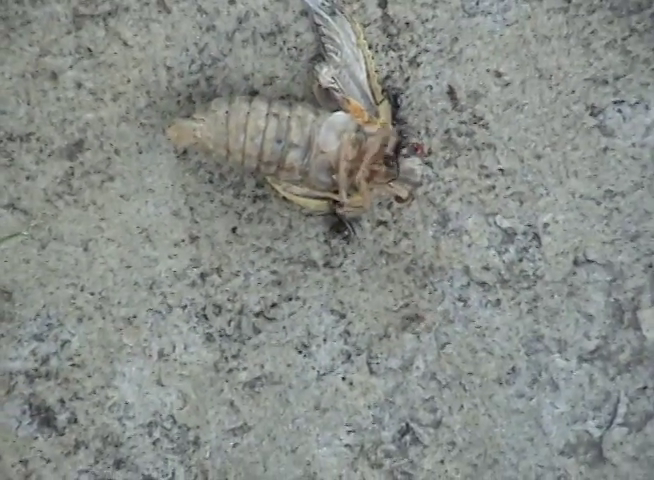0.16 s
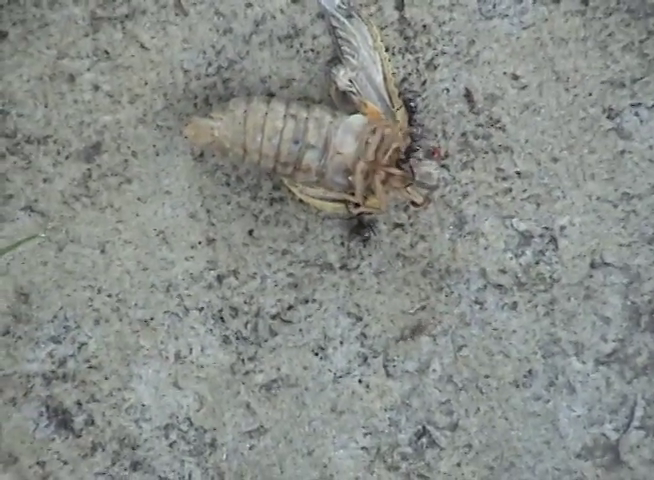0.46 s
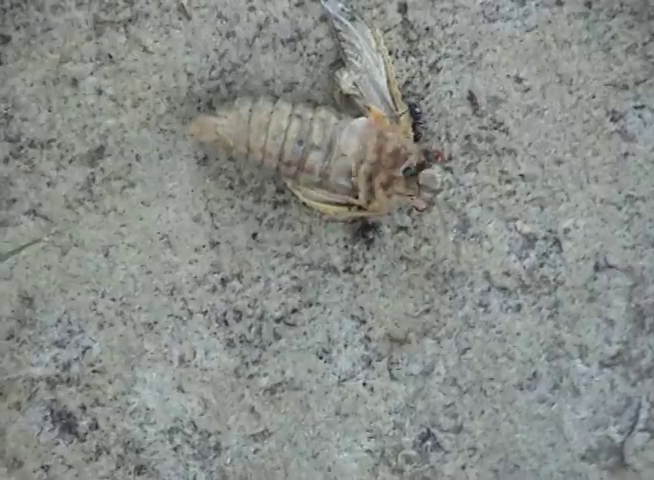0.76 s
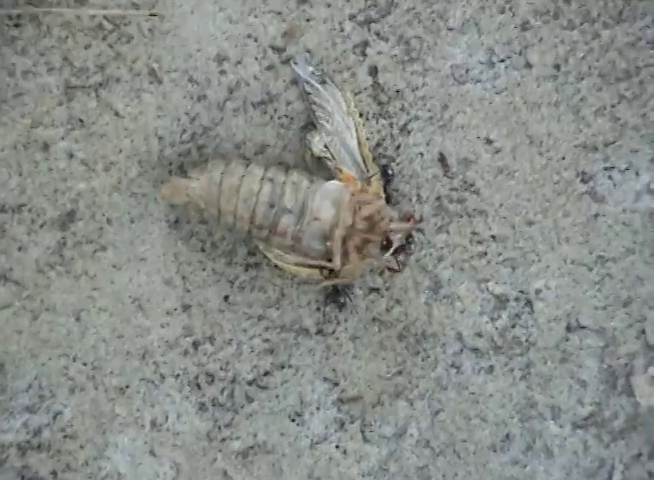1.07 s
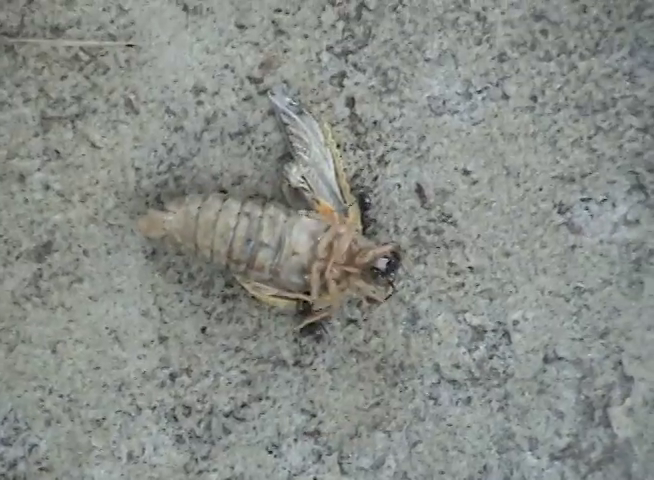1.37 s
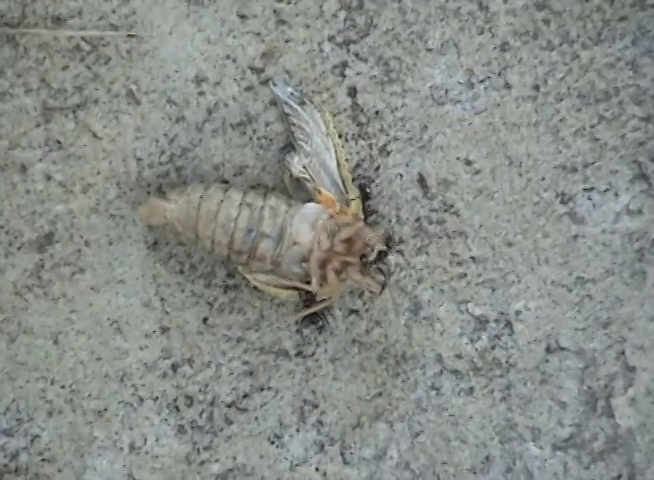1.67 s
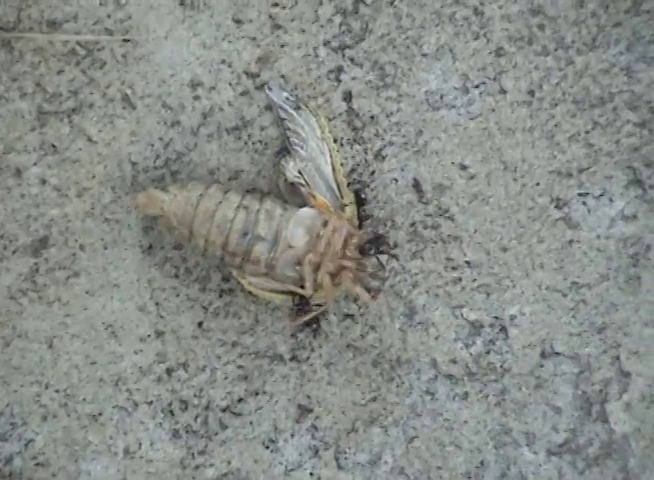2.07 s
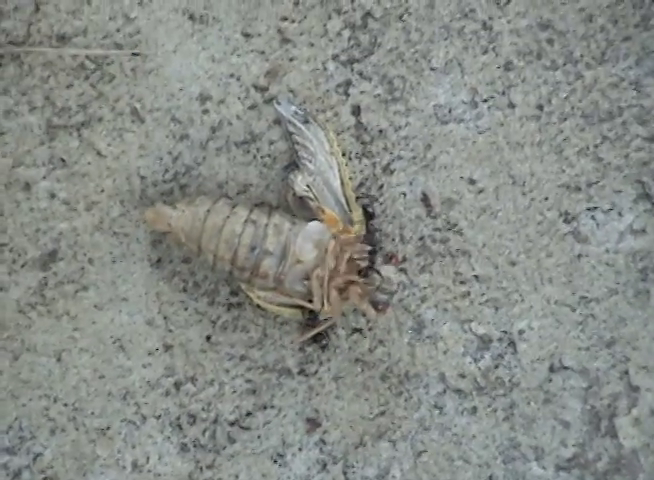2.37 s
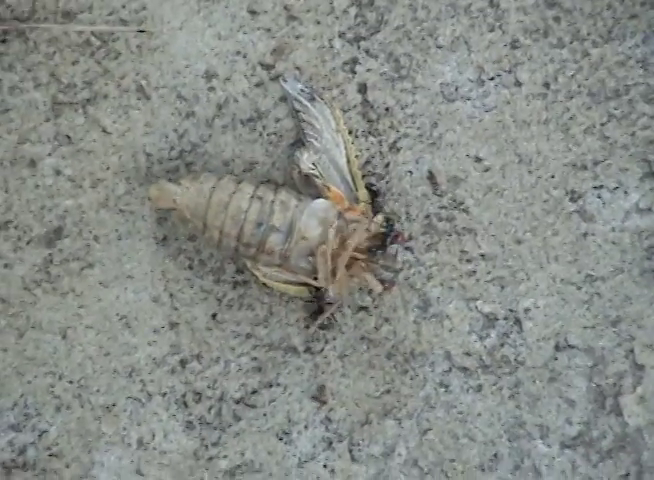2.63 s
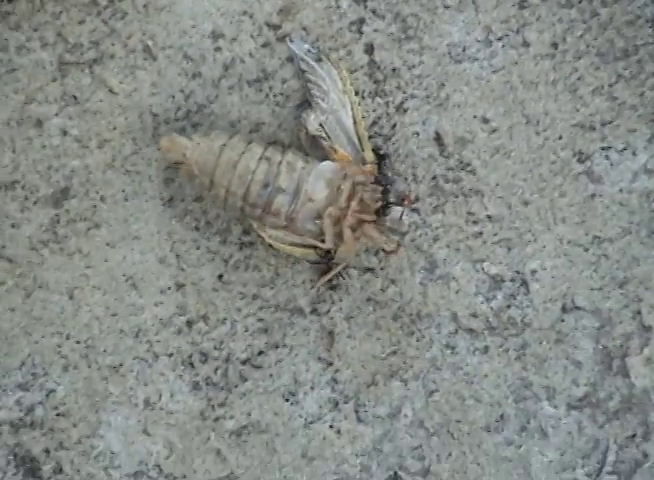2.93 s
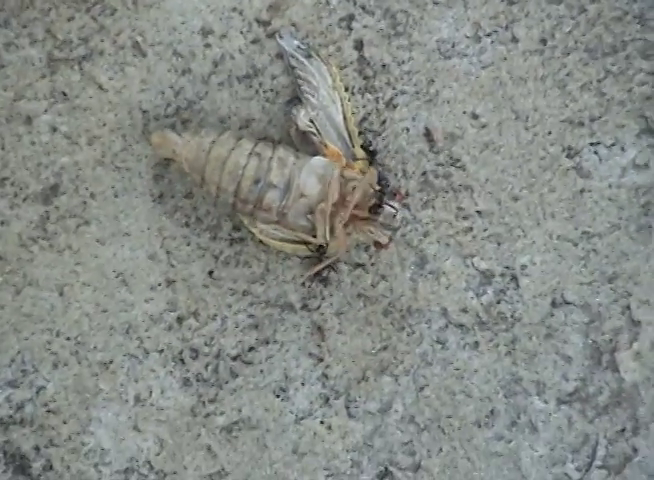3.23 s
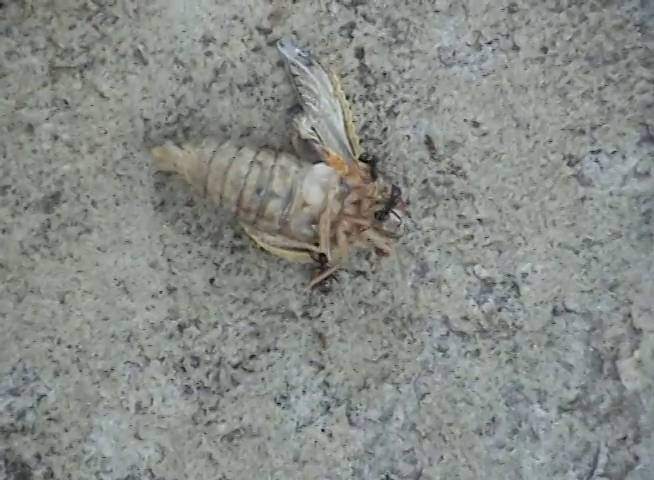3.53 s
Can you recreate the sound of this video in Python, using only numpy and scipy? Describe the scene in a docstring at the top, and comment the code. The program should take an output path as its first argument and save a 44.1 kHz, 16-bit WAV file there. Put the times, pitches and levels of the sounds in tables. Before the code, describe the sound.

Many cicadas whir steadily in the open air while the microphone picks up light handling taps.

```python
"""Cicada chorus in the trees

A dense chorus on a hand-held microphone, close above a stone slab. Many far cicadas click their
tymbals and merge into one whirring drone near 1.3 kHz; others hiss, the nearest in swells about three
times a second. Small handling knocks, ticks and scuffs sit over a faint machine hum and outdoor rumble."""
import sys
import numpy as np
from scipy import signal
from scipy.fft import rfft, irfft
from scipy.io import wavfile

SR = 44100
rng = np.random.default_rng(int(sys.argv[2]) if len(sys.argv) > 2 else 0)


def materialize(psi):
    """Save the field psi as 16-bit PCM at rate SR to the path in sys.argv[1].

    A 1-D psi becomes a single channel; in a 2-D psi each row is a channel.
    """
    bounded = np.clip(np.atleast_2d(psi).T, -1, 1)
    quanta = np.round(bounded * 32767).astype(np.int16)
    wavfile.write(sys.argv[1], SR, quanta)


N = 163170
T = np.arange(N) / SR


def droning_cicada(pitch_hz, wander_hz=10.2, ring_width_hz=72, clicks_per_s=170, swell_db=2):
    """One cicada: a train of tymbal clicks rings its hollow abdomen, whose pitch wanders."""
    click_rate = clicks_per_s * rng.uniform(.7, 1.3) * (1 + .35 * drift(120))
    clicks = np.diff(np.floor(np.cumsum(click_rate) / SR), prepend=0)
    carrier = np.exp(2j * np.pi * np.cumsum(pitch_hz + wander_hz * drift(4)) / SR)
    pole = np.exp(-np.pi * ring_width_hz / SR)
    # Shift down, low-pass, shift back: a resonance that follows the pitch.
    ring = carrier * signal.lfilter([(1 - pole) ** 2], [1, -2 * pole, pole ** 2], clicks * carrier.conj())
    return unit(ring.real) * amp(swell_db * drift(3.25))


def cicada_drone(count=20, pitch_hz=1328.7, spread_hz=19, width=0.4, trees_t60=0.15):
    """The nearer droning cicadas, scattered by the trees, over the blur of the farthest ones."""
    # Spectrum of the farthest cicadas. Each row: frequency in Hz, relative level in dB.
    far_spectrum = [(440, -58), (740, -30.5), (835, -18), (1020, -19), (1140, -8.5), (1320, 0),
                    (1360, -3.5), (1470, -12), (1720, -25.5), (2000, -37), (2600, -73), (4400, -120)]
    # Rise and fall of the whole drone. Each row: time in seconds, gain in dB.
    contour = [(0, -30), (.18, -31), (.34, -27), (.52, -31.5), (.8, -30), (1.1, -29), (1.5, -29.5),
               (2.2, -31), (2.5, -31), (3.18, -31.5), (3.26, -29), (3.35, -31.5), (3.7, -31.3)]
    voices = np.array([droning_cicada(pitch_hz + spread_hz * step) for step in np.linspace(-1, 1, count)])
    mid = unit(scatter(voices[::2].sum(0), trees_t60)[0])
    side = width * unit(scatter(voices[1::2].sum(0), trees_t60)[1])
    near = amp(-2.5) * unit(np.array([mid + side, mid - side]))
    far = amp(0.5) * diffuse_noise(far_spectrum)
    return (near + far) * amp(np.interp(T, *np.transpose(contour)))


def cicada_hiss(bed_db=-45.5, buzz_db=-49, rise_s=0.019, fall_s=0.035):
    """A steady bed of hissing cicadas, and a nearer, brighter one that buzzes in swells."""
    # Spectra of the bed and the near cicada. Each row: frequency in Hz, relative level in dB.
    bed_spectrum = [(1500, -10), (2000, -1), (2650, -3.5), (3150, -8), (3900, -1.5), (4880, -3.5),
                    (5620, 0), (6520, -3), (8140, -1), (8630, -4.5), (11400, -23.5), (14400, -31)]
    buzz_spectrum = [(4000, -18), (6300, -6.5), (7200, -1.5), (8200, 0.5), (8800, -4), (10500, -19),
                     (14000, -43)]
    # The near cicada's swells. Each row: start in seconds, length in seconds, relative level in dB.
    swells = [(0, 0.14, 0), (0.314, 0.19, -4), (0.567, 0.19, -1.5), (0.806, 0.13, -6), (0.952, 0.2, -3.5),
              (1.143, 0.26, -4), (1.408, 0.25, -4), (1.75, 0.11, -1), (1.872, 0.077, 1), (2.007, .25, -2),
              (2.34, 0.25, -3), (2.657, 0.25, -3), (3.022, 0.29, -2), (3.362, .26, -3)]
    effort = np.zeros(N)
    for start, length, db in swells:
        ramps = np.minimum((T - start) / rise_s, (start + length - T) / fall_s)
        effort += amp(db) * np.clip(ramps, 0, 1)
    buzz = amp(buzz_db + 1.5 * drift(24.88)) * effort * diffuse_noise(buzz_spectrum)
    bed = amp(bed_db + 0.62 * drift(18)) * diffuse_noise(bed_spectrum)
    return pan(buzz + bed, -0.6)


def handling_knocks(rise_s=0.0016, t60=0.013, echo_gain=0.26):
    """Dull knocks at the microphone: each rings one damped mode, with brief reflections."""
    # The knocks. Each row: start in seconds, peak in dB before panning, pitch in Hz, left over right in dB.
    knocks = [(.222, -33, 493, 12), (.5865, -26.5, 580, -7), (.5915, -29, 600, 17.5), (.66, -27, 610, -12),
              (.951, -31.5, 575, -13), (1.156, -28.5, 616, 0), (1.1765, -25.5, 655, 11),
              (1.221, -31, 760, 8), (1.301, -35.5, 590, -5), (1.403, -36, 610, -6),
              (2.0732, -22, 610, -8.5), (2.758, -29.5, 580, 7)]
    t, mix = T[:SR // 10], np.zeros((2, N))
    envelope = np.minimum(t / rise_s, 1) * amp(-60 * t / t60)
    for start, db, hz, pan_db in knocks:
        ring = envelope * np.sin(2 * np.pi * hz * t)
        add(mix, start, pan(at_peak(ring, db), pan_db))
    return mix + echo_gain * scatter(mix, t60=0.068)


def handling_ticks(snap_edge_hz=6600, crack_edge_hz=10000, crack_t60=0.0085):
    """Sharp ticks at the microphone: a short ringing snap with a fine crack of noise on top."""
    # The ticks. Each row: start in seconds, snap and crack peaks in dB before panning,
    # left over right in dB.
    ticks = [(.588, -38, -41, 7), (1.1565, -37, -34, 0), (1.1763, -28.5, -43, 14), (2.0169, -26, -38, 14),
             (2.073, -40, -31, -7), (2.756, -23, -40, -8), (3.2402, -32.5, -52, -9)]
    # What a tick rings. Each row: nominal frequency in Hz, relative level in dB, T60 in seconds.
    modes = [(1930, -2.5, 0.012), (2420, 0.5, 0.0085), (2840, 0, 0.011), (3270, -2.5, .010),
             (4080, 0.5, 0.0066), (4900, -2, 0.0062)]
    t, mix = T[:SR // 10], np.zeros((2, N))
    for start, snap_db, crack_db, pan_db in ticks:
        ring = np.zeros(len(t))
        for hz, db, t60 in modes:
            cycles = hz * rng.uniform(0.98, 1.06) * t + rng.random()
            ring += amp(db - 60 * t / t60) * np.sin(2 * np.pi * cycles)
        snap = signal.lfilter(*signal.butter(4, snap_edge_hz, fs=SR), ring)
        noise = signal.lfilter(*signal.butter(1, crack_edge_hz, fs=SR), rng.standard_normal(len(t)))
        crack = noise * amp(-60 * t / crack_t60)
        add(mix, start, pan(at_peak(snap, snap_db) + at_peak(crack, crack_db), pan_db))
    return mix


def handling_scuffs(slips_per_s=900, low_hz=130, high_hz=820):
    """Soft rubbing: sparse slips heard through a dull body."""
    # The scuffs. Each row: start in seconds, length in seconds, level at mid-scuff in dB.
    scuffs = [(0.399, 0.065, -44.5), (.47, 0.1, -42), (0.651, 0.028, -40)]
    mix = np.zeros((2, N))
    body = signal.butter(2, (low_hz, high_hz), "band", fs=SR, output="sos")
    for start, length, db in scuffs:
        slips = rng.standard_normal(N) * (rng.random(N) < slips_per_s / SR)
        rub = unit(signal.sosfilt(body, slips[:round(length * SR)]))
        add(mix, start, amp(db) * rub * np.sqrt(np.hanning(len(rub))))
    return mix


def machine_hum(pitch_hz=120.3, waver=0.00777, flicker_db=1.8):
    """A far machine hums, wavering in pitch and level."""
    # The hum's partials. Each row: harmonic number, mean level in dB.
    harmonics = [(1, -53.5), (2, -58), (3, -61)]
    phase = 2 * np.pi * np.cumsum(pitch_hz * (1 + waver * drift(8))) / SR
    hum = np.zeros(N)
    for number, db in harmonics:
        gain = amp(db + flicker_db * drift(5.51))
        hum += gain * unit(np.sin(number * phase + 2 * np.pi * rng.random()))
    return hum


def outdoor_rumble(level_db=-43):
    """Low, steady rumble of the open air."""
    # The rumble's spectrum. Each row: frequency in Hz, relative level in dB.
    spectrum = [(12, -42), (20, -11.5), (87, -1.5), (124, -1), (182, -3), (242, -4), (411, -9.5),
                (547, -8.5), (627, -11), (740, -17.5), (960, -29), (1630, -120)]
    return amp(level_db) * diffuse_noise(spectrum)


def diffuse_noise(spectrum):
    """Stereo noise of rms 1 with the given spectrum, falling 60 dB an octave outside it."""
    # Likeness of left and right at the microphone. Each row: frequency in Hz, coherence from 0 to 1.
    likeness = [(30, .8), (80, 1), (160, 0.89), (270, 0.87), (440, 0.28), (730, 0.53), (1200, 0.56),
                (2000, 0.42), (3260, 0.38), (5400, 0.72), (8900, 0.84), (14000, 0.9)]
    hz = np.fft.rfftfreq(N, 1 / SR)
    coherence = curve_at(likeness, hz)
    mid, side = rfft(rng.standard_normal((2, N))) * np.sqrt([1 + coherence, 1 - coherence])
    octaves_outside = np.abs(np.log2((hz + 1) / np.clip(hz + 1, spectrum[0][0], spectrum[-1][0])))
    gain = amp(curve_at(spectrum, hz) - 60 * octaves_outside)
    return unit(irfft(np.array([mid + side, mid - side]) * gain, N))


def scatter(x, t60):
    """A diffuse tail of reflections, different on each side, down 60 dB in t60 seconds."""
    tail = rng.standard_normal((2, N)) * amp(-60 * T / t60)
    return irfft(rfft(x) * rfft(tail / np.linalg.norm(tail[0])), N)


def drift(turns_per_s):
    """Random wandering of rms 1."""
    knots = rng.standard_normal(1024)
    return unit(np.interp(T * turns_per_s, np.arange(len(knots)), knots))


def curve_at(points, hz):
    """Interpolates a table on a log-frequency axis."""
    point_hz, value = np.transpose(points)
    return np.interp(np.log(hz + 1), np.log(point_hz + 1), value)


def amp(db):
    """Decibels to gain."""
    return 10 ** (np.asarray(db) / 20)


def unit(x):
    """Scales to rms 1."""
    return x / np.sqrt(np.mean(x ** 2) + 1e-20)


def at_peak(x, db):
    """Scales to a peak level."""
    return amp(db) * x / abs(x).max()


def pan(x, db):
    """Tips the balance to the left by db."""
    return x * amp([[db / 2], [-db / 2]])


def add(mix, start_s, sound):
    """Mixes a sound in at its start time."""
    part = mix[:, round(start_s * SR):][:, :sound.shape[-1]]
    part += sound[..., :part.shape[1]]


def scene():
    """Chorus, background and handling as they meet at the microphone."""
    outdoors = cicada_drone() + cicada_hiss() + machine_hum() + outdoor_rumble()
    return outdoors + handling_ticks() + handling_knocks() + handling_scuffs()


def record(dry):
    """The recorder's band limit, at 14.5 kHz."""
    lowpass = signal.firwin(511, 14500, window=("kaiser", 9), fs=SR)
    return signal.oaconvolve(dry, lowpass[None], "same")


dry = scene()
out = record(dry)
materialize(out)
```